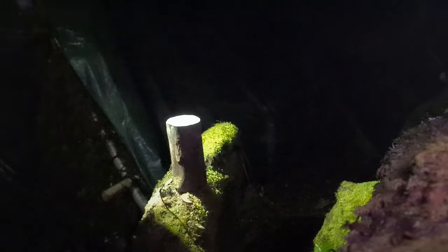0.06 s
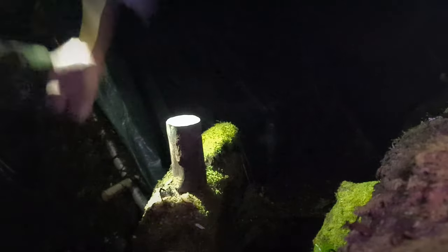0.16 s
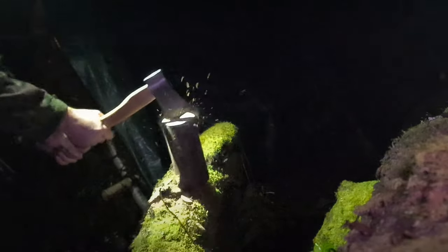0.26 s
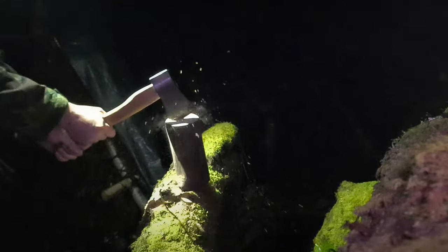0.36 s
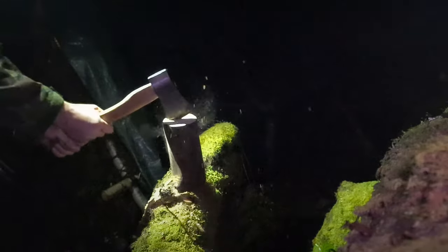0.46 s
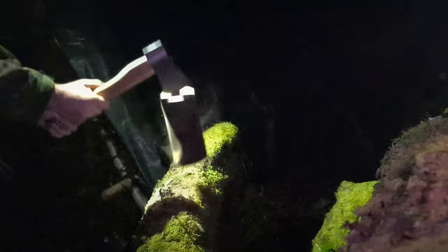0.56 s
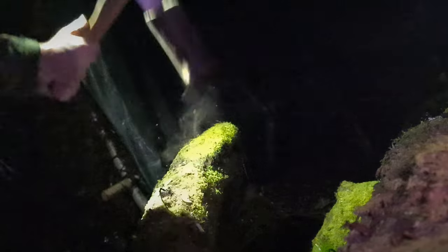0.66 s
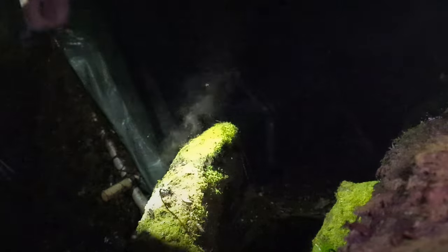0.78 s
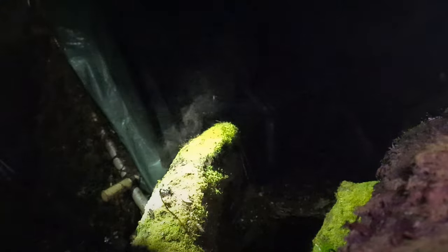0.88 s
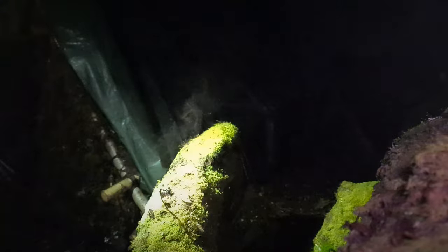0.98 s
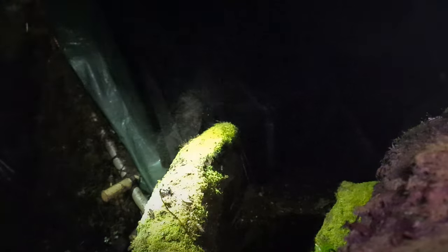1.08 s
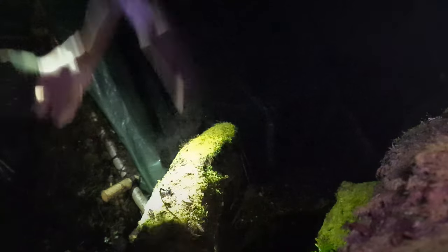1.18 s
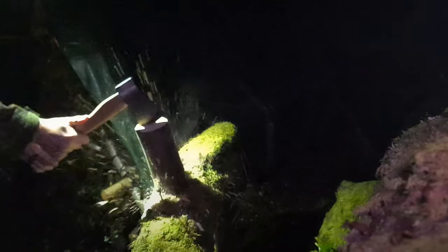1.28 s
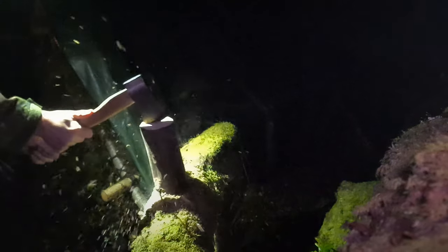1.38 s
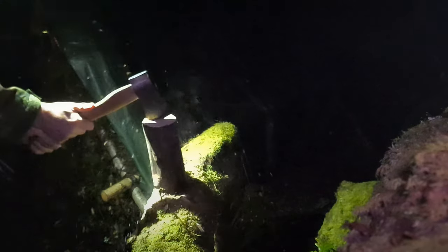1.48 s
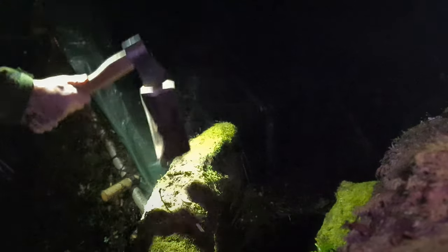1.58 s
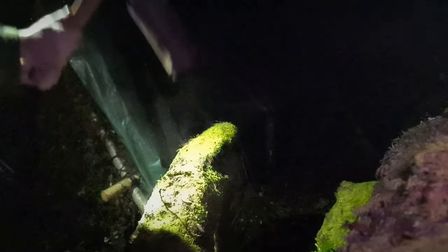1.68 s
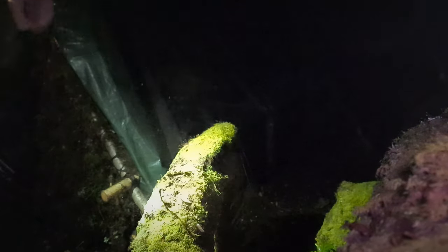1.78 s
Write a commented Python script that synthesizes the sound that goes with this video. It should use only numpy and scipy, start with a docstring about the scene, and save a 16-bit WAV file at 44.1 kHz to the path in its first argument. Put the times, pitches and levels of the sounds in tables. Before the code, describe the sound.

Hatchet chops on wood, close up outdoors at night. Faint hiss and low rumble, then at 0.22 s a hard, rather dull knock with a deep log thud, instant rebound and short scattered tail. A tiny chip taps near 0.64 s. At 1.23 s a second chop cracks brighter, with crisp splinters; small chips knock and tick faintly from 1.57 to 1.7 s as quiet returns.

```python
"""A hatchet, stuck in a short billet, is swung down twice onto a mossy log outdoors at night.
The blade's crack is shaped noise with an air pulse; billet and log are sets of decaying sine waves,
and the log sounds again as the billet rebounds. Trees and a tarp scatter a short tail of fading noise.
Splinters are uneven grains of hiss, chips knock and tick, and the night is quiet hiss over a low rumble."""
import sys
import numpy as np
from scipy import signal
from scipy.fft import rfft, irfft, next_fast_len
from scipy.io import wavfile
from scipy.ndimage import map_coordinates

SR = 44100
rng = np.random.default_rng(int(sys.argv[2]) if len(sys.argv) > 2 else 0)


def to_wav(s):
    """Save 16-bit WAV."""
    ch = np.atleast_2d(s).T  # columns
    pcm = np.round(np.clip(ch, -1, 1) * 32767)  # PCM
    wavfile.write(sys.argv[1], SR, pcm.astype(np.int16))


N = 79380  # samples in the scene

T = np.arange(SR // 2) / SR  # the half second given to each single sound, in seconds
SIDES = np.array([[.5], [-.5]])  # times a left-right dB: positive makes the left louder


def amp(db):
    """Turns decibels into a plain multiplier."""
    return 10 ** (np.asarray(db) / 20)


def unit(x):
    """Scales a sound to an average (rms) strength of 1."""
    return x / np.sqrt(np.mean(x ** 2) + 1e-20)


def along(points, hz):
    """Reads a curve of (frequency_hz, value) points on a log frequency axis."""
    f, v = np.transpose(points)
    return np.interp(np.log(hz + 1), np.log(f + 1), v)


def level(rows):
    """Multiplier over the whole scene from a curve of (time_s, level_db) points."""
    return amp(np.interp(np.arange(N) / SR, *np.transpose(rows)))


def wobble(rate):
    """A smooth random curve with `rate` random points a second."""
    points = rng.standard_normal(int(N * rate / SR) + 4)
    return map_coordinates(points, [np.arange(N) * rate / SR])


def filtered(x, response):
    """Multiplies each frequency of a sound by response(hz)."""
    n = x.shape[-1]
    m = next_fast_len(n + 8192)
    gain = response(np.fft.rfftfreq(m, 1 / SR))
    return irfft(rfft(x, m) * gain, m)[..., :n]


def brighter(x, db):
    """A treble shelf: frequencies well above 2816 Hz change by db, low ones stay."""
    return filtered(x, lambda hz: amp(db * hz ** 2 / (hz ** 2 + 2816 ** 2)))


def rush(spectrum, alike, size=N):
    """Stereo noise of rms 1; `alike` sets how similar left and right are at each frequency."""
    def shares(hz):
        # The more alike the sides, the more of the noise goes to the middle.
        turn = np.arccos(np.clip(along(alike, hz), -1, 1)) / 2
        return amp(along(spectrum, hz)) * [np.cos(turn), np.sin(turn)]

    mid, side = filtered(rng.standard_normal((2, size)), shares)
    return unit(np.array([mid + side, mid - side]))


def ring(modes, hold_s, lag_s=0, hardness_db=0, swell_cycles=0.29):
    """Struck wood: sine waves swell and die, each at a slightly new level; hardness lifts the high ones."""
    t = np.maximum(T - [[0], [lag_s]], 0)  # the right side starts lag_s late
    total = 0
    for hz, db, t60, pan_db in modes:
        octaves_up = np.log2(hz / modes[0][0])
        start_db = db + hardness_db * octaves_up + rng.normal(0, 0.95) + pan_db * SIDES
        swell = 1 - np.exp(-t * hz / swell_cycles)
        total = total + amp(start_db - 60 * t / t60) * swell * np.sin(2 * np.pi * hz * t)
    return total * np.exp(-(t / hold_s) ** 4)  # cut short around hold_s


def add(mix, s, sound):
    """Lays a stereo sound into the mix at s seconds."""
    part = mix[:, round(s * SR):][:, :sound.shape[1]]
    part += sound[:, :part.shape[1]]


# Level of the night hiss: (time_s, level_db)
HISS_LEVEL = [(0.0, -55), (0.25, -56.5), (0.586, -60), (1.022, -58.5), (1.308, -56), (1.8, -62)]
# Colour of the hiss: (frequency_hz, relative_level_db)
HISS_COLOUR = [(110, -22.5), (180, -12.5), (230, -13), (374, -5), (487, -10), (975, -14), (1850, -17),
               (5800, -27), (8290, -41), (15900, -38), (16100, -74.5)]
# How alike left and right are in the hiss: (frequency_hz, likeness from -1 to 1)
HISS_ALIKE = [(60, 0.076), (180, 0.51), (550, 0.16), (1650, 0.1), (4970, -0.19), (15000, -0.02)]
# Level of the low rumble: (time_s, level_db)
RUMBLE_LEVEL = [(0.0, -55.5), (0.25, -49), (0.56, -57), (0.732, -55), (0.832, -58), (1.232, -54.5),
                (1.332, -52.5), (1.658, -62), (1.8, -60)]
# Colour of the rumble: (frequency_hz, relative_level_db)
RUMBLE_COLOUR = [(12, -65), (20, -27), (35, -8.5), (59, 3), (150, -10), (168, -35.5), (220, -20.5),
                 (290, -68), (480, -120)]


def night():
    """Far hiss and a less steady low rumble: coloured noise whose level wanders."""
    hiss = level(HISS_LEVEL) * amp(.6 * wobble(18)) * rush(HISS_COLOUR, HISS_ALIKE)
    rumble_noise = rush(RUMBLE_COLOUR, [(25, .6), (150, 0.97)])
    rumble = level(RUMBLE_LEVEL) * amp(3.2 * wobble(36)) * rumble_noise
    return hiss + rumble


BITE_S, CRACK_T60_S = .0015, .011  # build-up of the crack; time for it to fall 60 dB
# Colour of the crack: (frequency_hz, relative_level_db)
CRACK_COLOUR = [(1200, -3.5), (2000, -2.5), (3320, -9), (4840, -17.5), (6120, -8), (9690, -28.5),
                (11400, -19), (14800, -17.5), (16600, -28.5)]


def blade_crack(treble_db):
    """The blade bites: noise grows by 8 dB, then drops back and dies very fast."""
    biting = amp(8 * T / BITE_S)
    dying = amp(-60 * (T - BITE_S) / CRACK_T60_S)
    noise = rush(CRACK_COLOUR, [(1000, 0.15)], size=len(T))
    return np.where(T < BITE_S, biting, dying) * brighter(noise, treble_db)


def air_push(width_s):
    """A pulse of air: a peak at the end of the bite with a dip on either side."""
    u = (T - BITE_S) / width_s
    return amp(5.5) * (1 - u ** 2) * np.exp(-u ** 2 / 2)


# Tones of the log: (pitch_hz, level_db, t60_s, left_right_db)
LOG_TONES = [(53.4, -31.5, 0.34, 12), (90.7, -20.5, 1, 8.5), (140.6, -22.5, 0.21, -1), (175, -14, 0.26, 3),
             (236.4, -12, 0.24, 0), (316.8, -4, 0.07, -2.5), (349.9, -22.5, 0.83, -5.5),
             (402.3, -7.5, 0.077, -14), (483.4, -27.5, 0.31, 8), (535.5, -25, 0.084, -10)]


def log_thud(swell_cycles):
    """The log's low tones ring until the moss damps them."""
    return ring(LOG_TONES, hold_s=0.094, swell_cycles=swell_cycles)


# Colour of the scattered tail: (frequency_hz, relative_level_db)
TAIL_COLOUR = [(150, -17), (400, 2), (800, -10), (1500, -19.5), (3000, -23), (4500, -27), (6500, -21.5),
               (9500, -29.5), (13000, -25.5), (15800, -36.5), (16100, -73)]
# How fast the tail dies, before each blow's stretch: (frequency_hz, t60_s)
TAIL_FADE = [(150, .25), (700, .17), (2000, .22), (6000, .24), (10000, .2), (15000, .165)]
# How alike left and right are in the echoes: (frequency_hz, likeness from -1 to 1)
ECHO_ALIKE = [(60, 1), (240, 0.86), (950, 0.72), (3770, 0.04), (15000, 0.011)]


def scattered_tail(stretch):
    """Echoes off trees and tarp bloom after a short gap; each frequency dies at its own speed."""
    noise = rush(TAIL_COLOUR, ECHO_ALIKE, size=len(T))
    hz, t, pieces = signal.stft(noise, SR, nperseg=256)
    t60 = stretch * along(TAIL_FADE, hz)[:, None]
    fading = signal.istft(pieces * amp(-60 * t / t60), SR, nperseg=256)[1][:, :len(T)]
    bloom = 1 - .7 * np.exp(-(T / .012) ** 2)  # starts at 0.3, opens within some 12 ms
    return fading * bloom * np.exp(-(T / stretch / .19) ** 4)


# Colour of the late echo: (frequency_hz, relative_level_db)
LATE_ECHO_COLOUR = [(200, -16.5), (350, 1), (750, 0), (1100, -18.5), (2000, -50)]


def late_echo(db):
    """A late echo of the thud: low noise that swells in, then fades by 60 dB per 0.73 s."""
    swell = 1 - np.exp(-T / 0.02)
    return amp(db - 60 * T / 0.73) * swell * rush(LATE_ECHO_COLOUR, ECHO_ALIKE, size=len(T))


SPLINTERS_PER_S, SPLINTER_S = 500, .0012  # how often on average; fade time of one grain
# Colour of the splinters: (frequency_hz, relative_level_db)
SPLINTER_COLOUR = [(1500, -9.5), (3000, 5.5), (6500, 9), (9500, -13), (13000, -18), (15800, -16.5),
                   (16100, -67.5)]


def splinters():
    """Fibres tear and bark crumbs scatter: uneven grains of hiss."""
    starts = rng.random(len(T)) < SPLINTERS_PER_S / SR
    hits = starts * amp(6 * rng.standard_normal(len(T)))  # strengths scatter by 6 dB
    grains = unit(signal.fftconvolve(hits, np.exp(-T / SPLINTER_S))[:len(T)])
    return grains * amp(-60 * T / .33) * rush(SPLINTER_COLOUR, [(1000, 0.9)], size=len(T))


# Tones of the billet, shared by knocks and chips: (pitch_hz, level_db, t60_s, left_right_db)
BILLET_TONES = [(742, 2, .06, -4), (1130, -3, .04, 4), (1345, -7, .04, 2), (1910, -14, .04, 0),
                (2320, -17, .04, 0), (3180, -21, .05, 0)]


def billet_knock(hardness_db):
    """The billet's tones ring very briefly, the right side just after the left."""
    return ring(BILLET_TONES, hold_s=.0065, lag_s=0.00018, hardness_db=hardness_db)


SECOND_CRACK_S, KNOCK_DELAY_S, REBOUND_S = .0045, .001, .016  # REBOUND_S is the billet's flight
# The two blows: (time_s, strength_db, air_push_width_s, hardness_db_per_octave, crack_db,
# crack_treble_db, tail_treble_db, tail_stretch (a factor), rebound_db, splinters_db,
# knock_left_right_db, late_echo_db); strength_db scales everything but the splinters
BLOW_LIST = [(0.2178, -8, .00032, -6, -17, -4, -7, .9, -1, -56, -2, -38),
             (1.2347, -9, .00024, 0, -9, 0, 0, 1.1, -1, -46, 3, -33)]


def chops():
    """Each blow: crack, air push, thud, echoes, splinters, knock and rebound, laid at their moments."""
    mix = np.zeros((2, N))
    for (s, db, push_s, hardness_db, crack_db, crack_treble_db, tail_treble_db, stretch,
         rebound_db, splinter_db, pan_db, far_db) in BLOW_LIST:
        crack = amp(crack_db) * blade_crack(crack_treble_db)
        add(mix, s - BITE_S, amp(db) * (crack + air_push(push_s)))
        # The edge jumps deeper: a softer second crack, left and right swapped.
        add(mix, s - BITE_S + SECOND_CRACK_S, amp(db - 9) * crack[::-1])
        add(mix, s, amp(db) * log_thud(swell_cycles=.8))
        tail = amp(-11.5) * brighter(scattered_tail(stretch), tail_treble_db)
        add(mix, s, amp(db) * (tail + late_echo(far_db)))
        add(mix, s, amp(splinter_db) * splinters())
        add(mix, s + KNOCK_DELAY_S, amp(db + pan_db * SIDES) * billet_knock(hardness_db))
        add(mix, s + REBOUND_S, amp(db + rebound_db) * log_thud(swell_cycles=0.25))
    return mix


# Chips landing: (time_s, billet_knock_db, dry_tick_db, left_right_db)
CHIP_LIST = [(.638, -56.5, -80, 15), (1.098, -76.5, -66.5, 11), (1.167, -68, -84, 3),
             (1.565, -43, -60.5, 3), (1.61, -66, -82, 0), (1.635, -75, -72, 0), (1.66, -62, -71, 16),
             (1.688, -70, -65, 7)]


def chips():
    """Chips landing: small dull knocks on the billet and dry ticks of short noise."""
    mix = np.zeros((2, N))
    tick_colour = [(1500, -4), (3500, 3), (15800, -17), (16100, -60)]  # (frequency_hz, level_db)
    for s, knock_db, tick_db, pan_db in CHIP_LIST:
        noise = rush(tick_colour, [(1000, 0.4)], size=len(T))
        tick = amp(tick_db - 60 * T / 0.031) * noise  # falls 60 dB in 31 ms
        knock = amp(knock_db) * ring(BILLET_TONES, hold_s=.0045, hardness_db=-10, swell_cycles=.2)
        add(mix, s, amp(pan_db * SIDES) * (knock + tick))
    return mix


def scene():
    """The night, the two chops and the chips together."""
    return night() + chops() + chips()


def record(dry):
    """Keeps nothing at or above the band limit of 16800 Hz."""
    return filtered(dry, lambda hz: hz < 16800)


dry = scene()
out = record(dry)
to_wav(out)
```